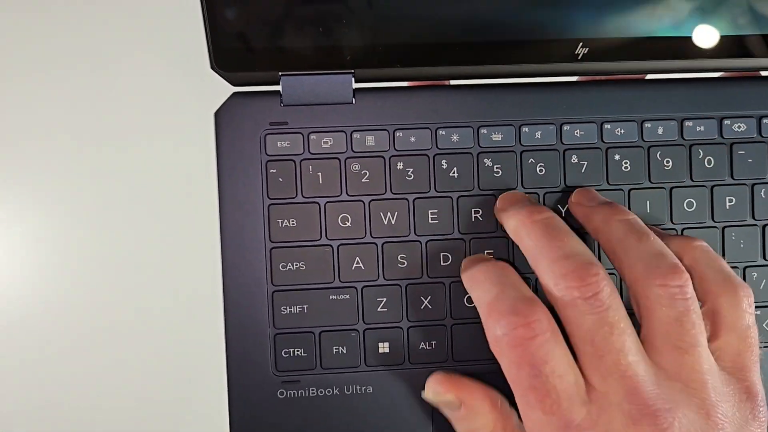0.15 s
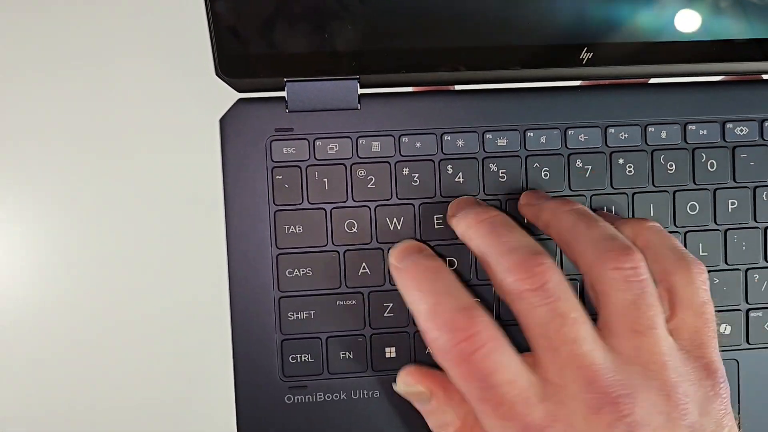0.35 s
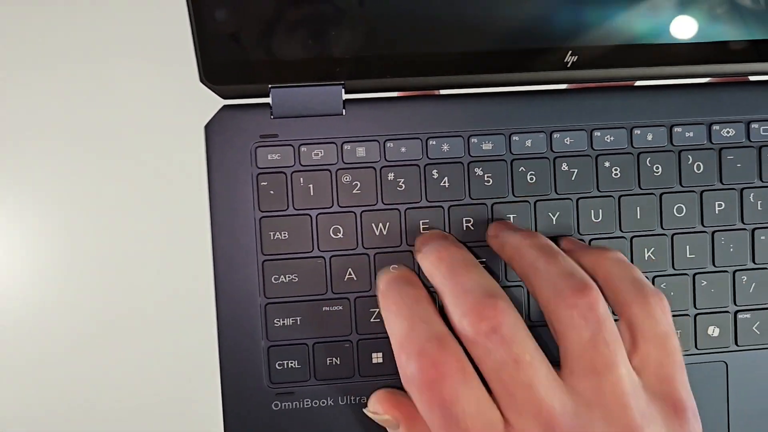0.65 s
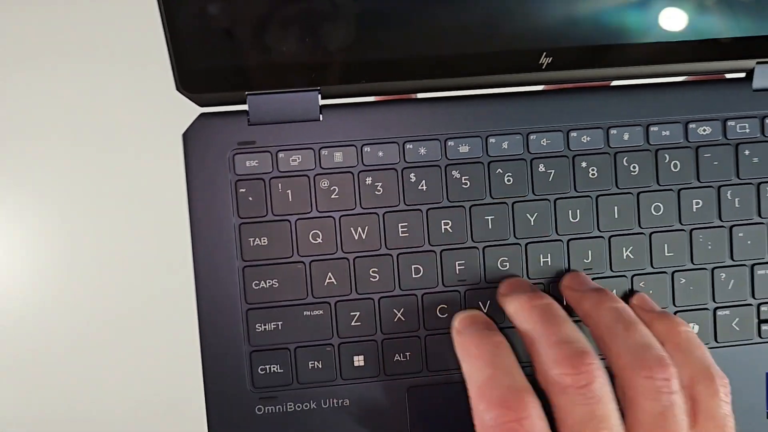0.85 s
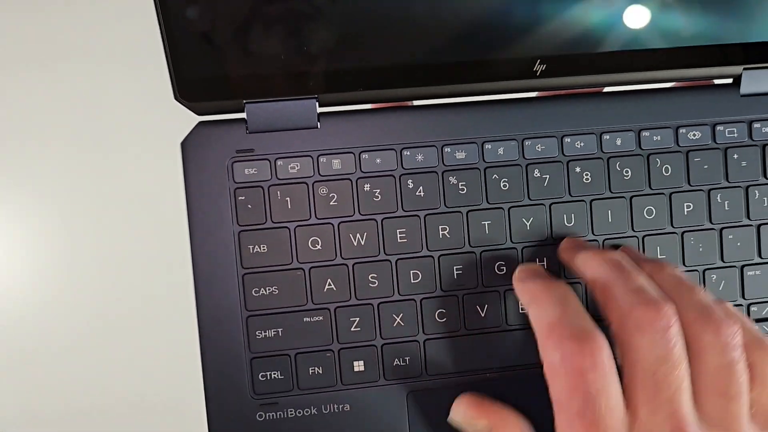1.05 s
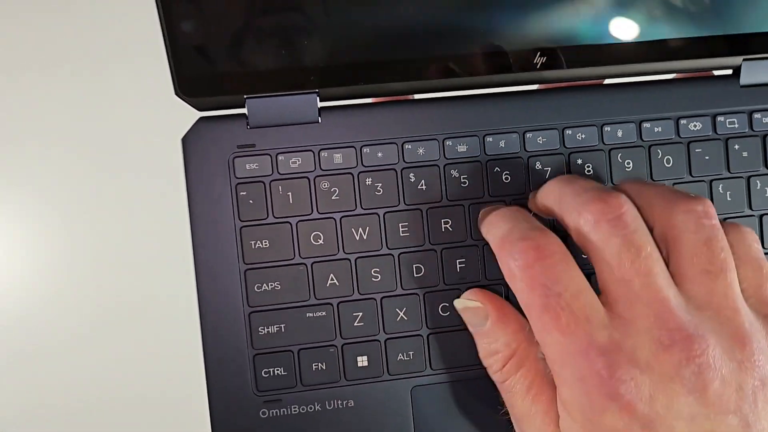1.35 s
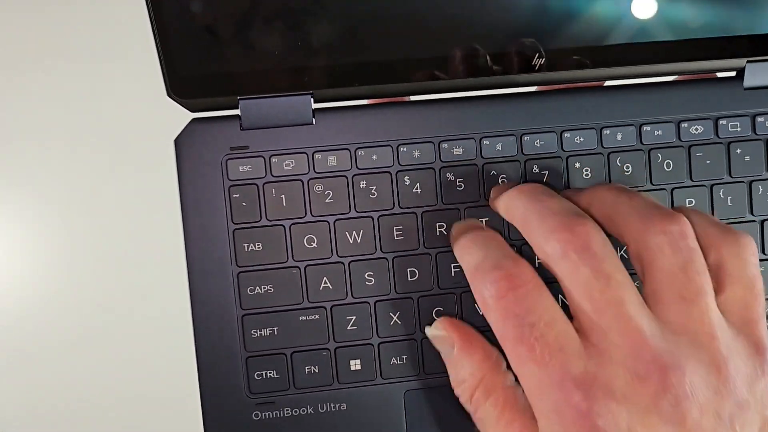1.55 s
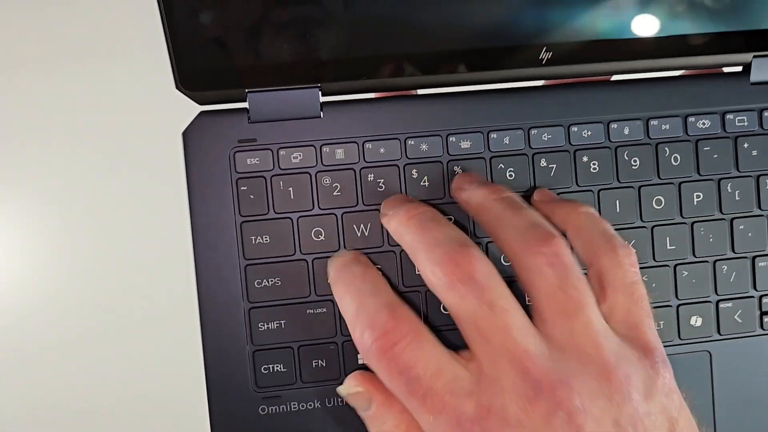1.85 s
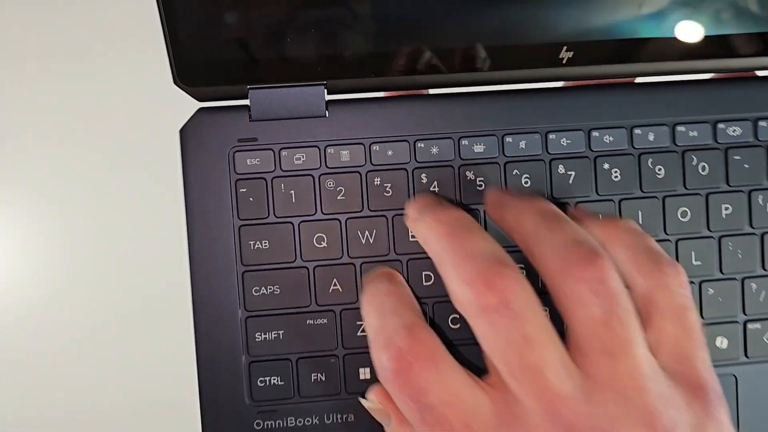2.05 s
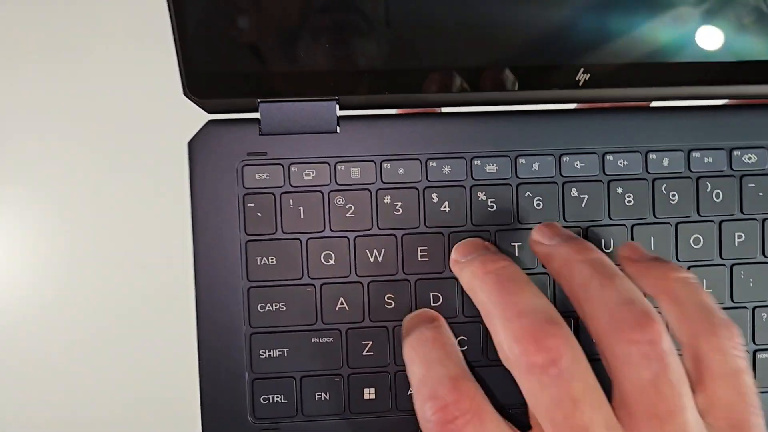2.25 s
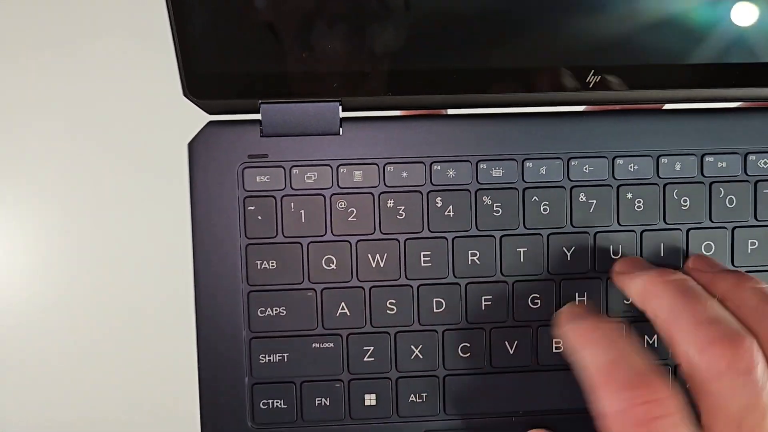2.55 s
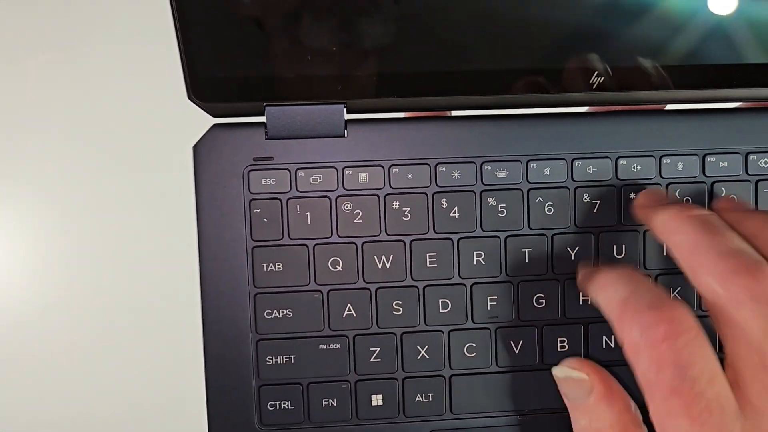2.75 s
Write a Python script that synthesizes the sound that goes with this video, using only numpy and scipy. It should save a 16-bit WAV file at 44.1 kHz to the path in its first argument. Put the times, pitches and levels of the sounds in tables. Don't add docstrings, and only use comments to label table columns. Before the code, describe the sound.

Laptop keys clatter in a quick uneven run, with light ticks, hollow knocks and low desk thuds

```python
import sys
import numpy as np
from scipy import signal
from scipy.fft import rfft, irfft
from scipy.io import wavfile
from scipy.ndimage import uniform_filter1d

SR = 44100
rng = np.random.default_rng(int(sys.argv[2]) if len(sys.argv) > 2 else 0)


def unload_audio(sound):
    columns = np.transpose(np.atleast_2d(sound))
    steps = np.round(np.clip(columns, -1, 1) * 32767)
    wavfile.write(sys.argv[1], SR, steps.astype(np.int16))


def ratio_of_db(decibels):
    return 10 ** (np.asarray(decibels, float) / 20)


N = 127890


def band(x, lo_hz, hi_hz):
    sos = signal.butter(2, [lo_hz, min(hi_hz, 0.45 * SR)], "bandpass", fs=SR, output="sos")
    return signal.sosfilt(sos, x)


def unit(x):
    return x / np.sqrt(uniform_filter1d(x ** 2, size=130).max())


def colour(x, spectrum):
    hz = np.fft.rfftfreq(x.shape[-1], 1 / SR) + 1
    points = np.array(spectrum)
    gain = ratio_of_db(np.interp(np.log(hz), np.log(points[:, 0]), points[:, 1])) * (hz > points[0, 0])
    y = irfft(rfft(x) * gain, x.shape[-1])
    return y / y.std()


def walk(rate_hz):
    width = int(SR / rate_hz)
    drift = uniform_filter1d(uniform_filter1d(rng.standard_normal(N), width), width)
    return drift / drift.std()


def add(out, start_s, sound):
    i = max(int(start_s * SR), 0)
    out[..., i:i + sound.shape[-1]] += sound[..., :N - i]


def ports(mid, other):
    unlike_hz = 3340
    side = signal.sosfilt(signal.butter(1, unlike_hz, "highpass", fs=SR, output="sos"), other)
    return np.array([mid + side, mid - side])


def ticks():
    # time in seconds, peak level in dB.
    tick_hits = [(0.1163, -49), (0.121, -45.5), (0.1315, -27), (0.1416, -54), (0.2292, -54), (0.27, -60),
                 (0.2755, -60.5), (0.3254, -45), (0.3291, -33), (0.3325, -39), (0.3364, -33.5),
                 (0.4288, -45.5), (0.4318, -44.5), (0.6061, -40.5), (0.6101, -32.5), (0.6151, -38.5),
                 (0.6173, -46), (0.713, -41), (0.718, -44), (0.7651, -54.5), (0.7888, -48.5),
                 (0.8058, -39), (0.899, -37), (0.9019, -33.5), (0.908, -55), (0.9893, -52),
                 (1.0063, -44.5), (1.0615, -54), (1.0956, -38), (1.0999, -38.5), (1.1975, -51),
                 (1.202, -53.5), (1.2673, -30), (1.271, -34), (1.3515, -42), (1.4115, -59.5),
                 (1.4874, -37), (1.491, -33.5), (1.4981, -45), (1.4998, -43), (1.572, -49),
                 (1.6572, -41.5), (1.661, -47), (1.677, -47.5),
                 (1.6797, -44), (1.6892, -50), (1.693, -41), (1.724, -59), (1.725, -40), (1.7445, -48.5),
                  (1.8226, -52), (1.8445, -46), (1.849, -46), (1.853, -40), (1.8573, -33.5), (1.878, -47),
                  (1.9631, -43.5), (1.9685, -44), (2.0247, -47), (2.029, -64), (2.0925, -48), (2.1251, -52),
                  (2.1339, -47.5), (2.1405, -50), (2.2015, -45), (2.259, -63), (2.3012, -62), (2.321, -52),
                  (2.3271, -47), (2.3342, -39.5), (2.336, -53), (2.388, -43.5), (2.439, -31), (2.5101, -49),
                  (2.558, -48), (2.5647, -45.5), (2.5702, -44), (2.5731, -33.5), (2.5797, -58.5),
                  (2.6314, -59), (2.6744, -42.5), (2.6814, -43.5), (2.7344, -48), (2.7526, -45),
                  (2.7585, -42), (2.763, -36), (2.7658, -32.5), (2.8465, -59)]
    hold_s, rise_s, snap_t60_s = 0.0009, 0.0007, 0.007
    rattle_t60_s, rattle_db = 0.045, -7
    grain_db, patchy_db, pan_db = 5, 3.5, -1.5
    split_hz = 5680
    edges_hz = split_hz * 1.45 ** np.arange(-2, 4)
    out, t = np.zeros((2, N)), np.arange(5000) / SR
    grain_len = len(t) // 125
    since = np.maximum(t - hold_s, 0)
    for start_s, db in tick_hits:
        grain = ratio_of_db(grain_db * np.repeat(rng.standard_normal(125), grain_len))
        grain[:grain_len] = ratio_of_db(grain_db)
        snap = ratio_of_db(-60 * since / snap_t60_s) * grain
        rattle = ratio_of_db(rattle_db - 60 * since / rattle_t60_s)
        burst = rng.standard_normal((2, len(t))) * (snap + rattle) * np.minimum(t / rise_s, 1) ** 2
        patch_db = patchy_db * rng.standard_normal(5) - 0.93 * (edges_hz[:-1] < split_hz)
        burst = sum((-1) ** k * ratio_of_db(patch_db[k]) * band(burst, edges_hz[k], edges_hz[k + 1]) for k in range(5))
        burst = burst / np.sqrt(uniform_filter1d(burst[0] ** 2, size=40).max())
        pan = pan_db * rng.standard_normal() * np.array([[0.5], [-0.5]])
        add(out, start_s - 0.0004, ports(*burst) * ratio_of_db(db + pan))
    return out


def rings(modes, push, lean_db):
    t = np.arange(len(push)) / SR
    hz, db, t60_s = np.array(modes).T[:, :, None]
    t60_s = np.minimum(t60_s, 55 / hz)
    hz = hz * (1 + 0.012 * rng.standard_normal(hz.shape))
    fade = ratio_of_db(db + lean_db - 60 * t / t60_s) * np.minimum(t * hz / 2, 1)
    response = (fade * np.sin(2 * np.pi * hz * t)).sum(0)
    return unit(signal.fftconvolve(response, push)[:len(t)])


def knocks():
    # time in seconds, deck level in dB, deck pitch in Hz, cap level in dB, hinge # level in dB.
    knock_hits = [(0.001, -52.5, 740, -56.5, -59.5), (0.12, -45.5, 650, -48.5, -61),
                  (0.1326, -38.5, 670, -38, -35), (0.145, -41.5, 790, -60, -66),
                  (0.174, -50, 670, -71, -57), (0.23, -54, 783, -60, -63), (0.269, -59, 667, -63, -70),
                  (0.328, -40, 780, -41, -44.5), (0.335, -43, 785, -33.5, -38),
                  (0.365, -51.5, 804, -69, -57), (0.421, -51, 760, -67, -65), (0.431, -78, 794, -53, -43),
                  (0.6095, -44.5, 560, -44, -41.5), (0.628, -48.5, 790, -54, -70),
                  (0.714, -49, 580, -48.5, -60), (0.765, -41.5, 659, -43, -76),
                  (0.792, -52.5, 657, -54, -69), (0.808, -47.5, 788, -51.5, -58),
                  (0.9, -44, 791, -50.5, -42.5), (1.01, -60, 814, -54.5, -63),
                  (1.061, -50, 770, -60, -80), (1.098, -40.5, 578, -42, -48), (1.121, -51, 690, -58, -79),
                  (1.196, -44, 630, -56.5, -72), (1.267, -34, 785, -35.5, -40.5),
                  (1.31, -47, 790, -51, -59), (1.35, -51, 800, -48, -61),
                  (1.492, -37, 785, -41.5, -44.5), (1.569, -48, 790, -50.5, -66),
                   (1.662, -54, 830, -41.5, -53.5), (1.679, -46.5, 791, -37, -47.5),
                   (1.7, -46, 580, -68, -60), (1.725, -49, 783, -54, -62), (1.848, -41.5, 755, -52, -50),
                   (1.856, -40, 780, -36, -38.5), (1.879, -40, 567, -43, -39.5),
                   (1.894, -42, 577, -50, -52), (1.917, -57, 570, -63, -62), (1.966, -51, 584, -46.5, -56),
                   (2.022, -44, 664, -53, -65), (2.091, -51.5, 785, -55, -75),
                   (2.134, -54.5, 650, -54.5, -63.5), (2.301, -55, 760, -60, -86),
                   (2.33, -50.5, 664, -48.5, -55), (2.437, -42.5, 570, -44.5, -43),
                   (2.505, -48, 667, -55.5, -61.5), (2.571, -37.5, 788, -43.5, -52),
                   (2.632, -62, 760, -59, -77), (2.653, -51.5, 770, -56, -77),
                   (2.676, -52, 576, -49, -53.5), (2.733, -59, 562, -49.5, -63),
                   (2.754, -38, 843, -43, -57), (2.764, -44, 780, -41, -40.5)]
    # pitch in Hz, level in dB, t60 in seconds.
    deck_modes = [(578, -4.5, 0.08), (667, 7.5, 0.038), (783.9, 0, 0.06)]
    cap_modes = [(1160, -2.5, 0.044), (1256, 8, 0.016), (1381, -6.5, 0.047)]
    hinge_modes = [(2102, 0.78, 0.019), (2267, 0.75, 0.027), (2456, -4.8, 0.022)]
    push_s, push_rough, focus_oct = 0.0039, 0.6, 0.12
    scatter_db, crack_db = 5, -2
    out, t = np.zeros(N), np.arange(5000) / SR
    for start_s, deck_db, hit_hz, cap_db, hinge_db in knock_hits:
        noise = rng.standard_normal((2, len(t)))
        cap_lean_db, hinge_lean_db = scatter_db * rng.standard_normal((2, 3, 1))
        push = push_rough * noise[0] * np.exp(-t / push_s)
        push[0] = np.sqrt(push_s * SR / 2)
        off_oct = np.log2(np.array(deck_modes)[:, :1] / hit_hz)
        deck_lean_db = -6 * np.minimum((off_oct / focus_oct) ** 2, 1.6)
        crack = unit(band(noise[1] * np.exp(-t / push_s / 2), 1580, 3230))
        deck = ratio_of_db(deck_db) * rings(deck_modes, push, deck_lean_db)
        cap = ratio_of_db(cap_db) * rings(cap_modes, push, cap_lean_db)
        hinge = ratio_of_db(hinge_db) * (rings(hinge_modes, push, hinge_lean_db) + ratio_of_db(crack_db) * crack)
        add(out, start_s, deck + cap + hinge)
    return out * ratio_of_db(-0.5)


def swell(t, hz, rise_s, t60_s, phase):
    fade = (1 - np.exp(-(t / rise_s) ** 2)) * ratio_of_db(-60 * t / t60_s)
    return unit(fade * np.sin(2 * np.pi * hz * t + phase))


def thumps():
    # time in seconds, case level in dB, case pitch in Hz, desk level in dB, lid level in dB.
    thump_hits = [(0, -47, 129, -52, -65), (0.128, -38, 150, -39, -43), (0.327, -39.5, 155, -49.5, -39),
                  (0.428, -58, 254, -64, -53), (0.608, -43, 136, -50, -50.5), (0.714, -48.5, 147, -58, -78),
                  (0.8, -51, 174, -54.5, -73), (0.9, -38, 127, -44, -54), (1.007, -47.5, 134, -54, -56),
                  (1.096, -41.5, 205, -47.5, -43.5), (1.265, -32.5, 181, -39, -36.5),
                  (1.348, -53, 142, -54, -58), (1.488, -40, 180, -44.5, -50.5),
                  (1.657, -42.5, 185, -59, -51.5), (1.68, -48.5, 172, -44, -44.5),
                  (1.847, -46, 253, -44.5, -43), (1.877, -34, 215, -45, -38), (1.893, -39, 187, -47, -48),
                  (1.929, -39, 241, -42.5, -49.5), (2.333, -43, 173, -43.5, -58),
                  (2.436, -35, 142.4, -40, -50), (2.568, -36.5, 137, -38.5, -43.5),
                  (2.675, -44.5, 149, -47, -53.5), (2.763, -41.5, 173, -39, -45)]
    case_rise_s, case_t60_s, rough_db = 0.005, 0.06, -6
    lid_hz, lid_t60_s, panel_hz = 360, 0.065, 249.1
    desk_hz, desk_late_s, desk_rise_s, desk_t60_s = 101, 0.010, 0.011, 0.085
    out, t = np.zeros(N), np.arange(8000) / SR
    for start_s, case_db, case_hz, desk_db, lid_db in thump_hits:
        c = rng.standard_normal(5)
        rough = unit(band(rng.standard_normal(len(t)) * ratio_of_db(-20 * t / case_t60_s), 44, 328))
        case = swell(t, case_hz, case_rise_s, case_t60_s, c[0]) + ratio_of_db(rough_db) * rough
        lid = swell(t, lid_hz * (1 + 0.05 * c[1]), case_rise_s / 2, lid_t60_s, c[2])
        panel = swell(t, panel_hz, desk_rise_s, 2 * lid_t60_s, c[3])
        desk = swell(t, desk_hz * (1 + 0.098 * c[3]), desk_rise_s, desk_t60_s, c[4])
        add(out, start_s, ratio_of_db(case_db) * case + ratio_of_db(lid_db) * (lid + ratio_of_db(-6) * panel))
        add(out, start_s + desk_late_s, ratio_of_db(desk_db) * desk)
    return out


def bar():
    # time in seconds, peak level in dB, t60 in seconds.
    bar_hits = [
        (1.88, -37.5, 0.39),
        (1.96, -43, 0.84),
    ]
    out, t = np.zeros(N), np.arange(20000) / SR
    for (start_s, db, t60_s), lo_hz, hi_hz in zip(bar_hits, (130, 25), (500, 110)):
        rumble = band(rng.standard_normal(len(t)) * ratio_of_db(-60 * t / t60_s), lo_hz, hi_hz)
        add(out, start_s, ratio_of_db(db) * unit(rumble))
    return out


def brush():
    # start in seconds, end in seconds, level in dB.
    strokes = [(0, 0.104, -53.5), (0.354, 0.44, -59), (0.592, 0.674, -64), (0.74, 0.82, -56),
               (0.829, 0.879, -57), (0.888, 1.02, -56.5), (1.012, 1.093, -60), (1.128, 1.148, -51.5),
               (1.678, 1.758, -51.5), (1.986, 2.044, -58), (2.333, 2.463, -56), (2.63, 2.695, -56.5),
               (2.708, 2.78, -55.5), (2.797, 2.857, -62)]
    # frequency in Hz, level in dB.
    hiss_colour = [(1180, -5), (2000, -7.5), (3310, -13), (14200, -9), (16000, 0)]
    t, gain = np.arange(N) / SR, np.zeros(N)
    for start_s, end_s, db in strokes:
        gain += ratio_of_db(db - 5 * (t - start_s) / (end_s - start_s)) * (t > start_s) * (t < end_s)
    grains = rng.standard_normal((2, N)) * ratio_of_db(0.5 * rng.exponential(size=N))
    hiss = colour(grains, hiss_colour)
    hiss = sum((-1) ** k * band(hiss, 1500 * 1.5 ** k, 2250 * 1.5 ** k) * ratio_of_db(2 * walk(20)) for k in range(6))
    return ports(*hiss) * uniform_filter1d(gain, size=900) * ratio_of_db(2.0 * walk(78))


def echo(x):
    echo_db, low_t60_s, high_t60_s = -9, 0.27, 0.3
    t = np.arange(15000) / SR
    noise = rng.standard_normal((2, 2, len(t))) * np.minimum(t / 0.002, 1)
    low = band(noise[0], 156, 2080) * ratio_of_db(-60 * t / low_t60_s)
    high = band(noise[1], 1140, 14600) * ratio_of_db(-60 * t / high_t60_s + 2)
    tail = low + high
    tail = tail / np.sqrt((tail ** 2).sum(1).mean())
    return ratio_of_db(echo_db) * signal.fftconvolve(x[None], tail, axes=1)[:, :N]


def room_tone():
    # frequency in Hz, level in dB.
    room_colour = [(30, -18), (75, 0), (312, -9.5), (697, -19.5), (1950, -30), (16000, -46.5)]
    air = colour(rng.standard_normal((2, N)), room_colour) * ratio_of_db(-60.5) * ratio_of_db(walk(4.7))
    side = band(air[1], 880, 20000) + 0.25 * air[1]
    return air[0] + np.array([[1], [-1]]) * side


def scene():
    port_lag_s = 0.00004
    body = knocks() + thumps() + bar()
    late = np.interp(np.arange(N) - port_lag_s * SR, np.arange(N), body)
    direct = np.array([ratio_of_db(0.3) * body, ratio_of_db(-0.3) * late])
    bounce = 0.18 * np.array([[1], [-1]]) * np.roll(body, shift=150)
    near = ticks() + direct + bounce
    return near + echo(near.mean(0)) + brush() + room_tone()


def band_limit(x):
    return signal.sosfilt(signal.butter(12, 16970, fs=SR, output="sos"), x)


def record(dry):
    bottom_hz, top_hz = 42, 15700
    mix = signal.sosfilt(signal.butter(2, bottom_hz, "highpass", fs=SR, output="sos"), dry)
    mix = signal.sosfilt(signal.ellip(7, 0.2, 50, top_hz, fs=SR, output="sos"), mix)
    return band_limit(mix)


dry = scene()
out = record(dry)
unload_audio(out)
```